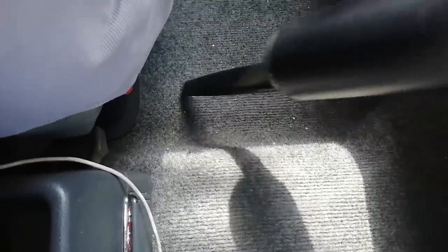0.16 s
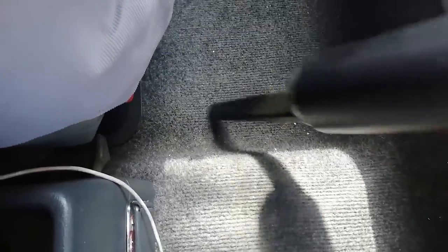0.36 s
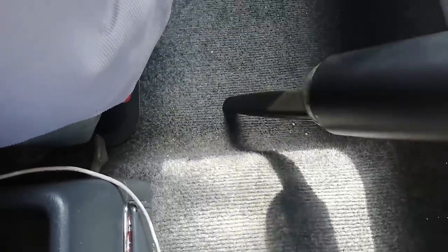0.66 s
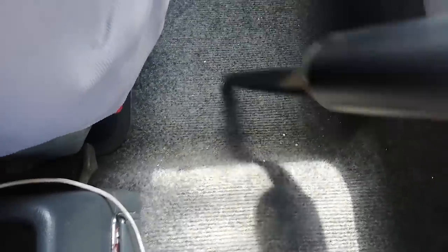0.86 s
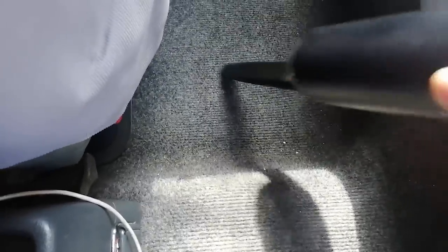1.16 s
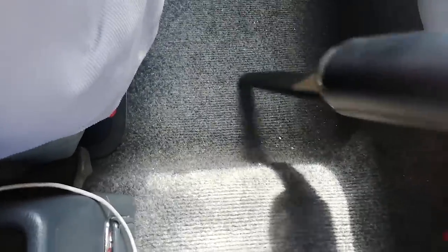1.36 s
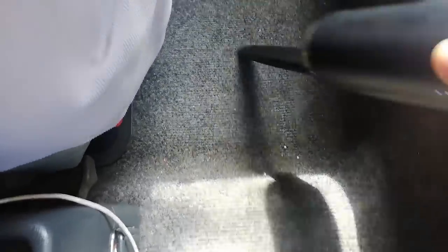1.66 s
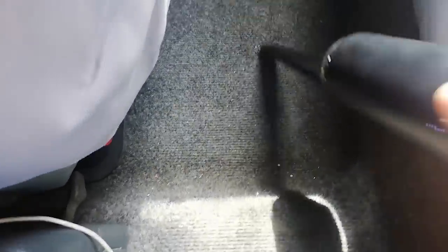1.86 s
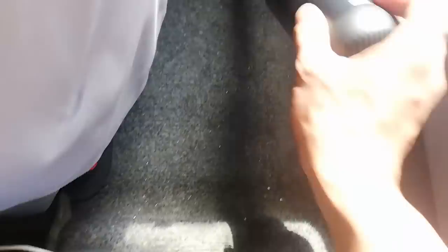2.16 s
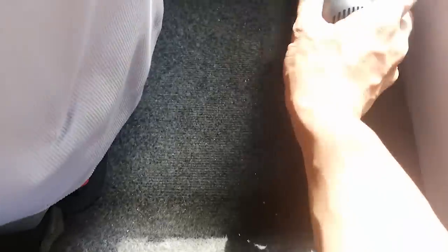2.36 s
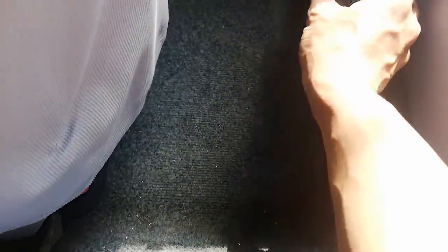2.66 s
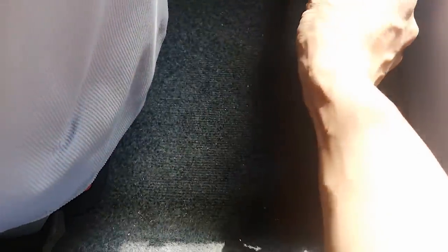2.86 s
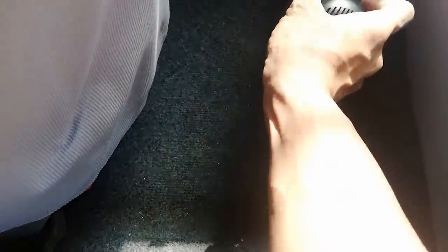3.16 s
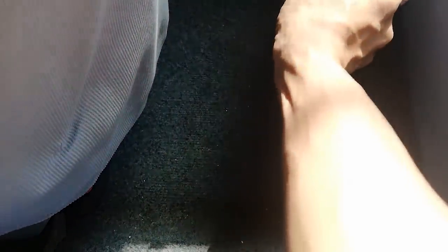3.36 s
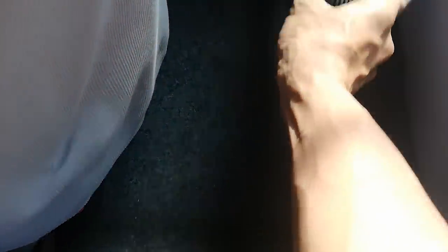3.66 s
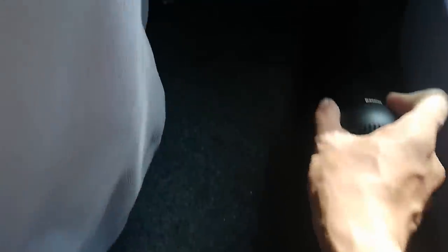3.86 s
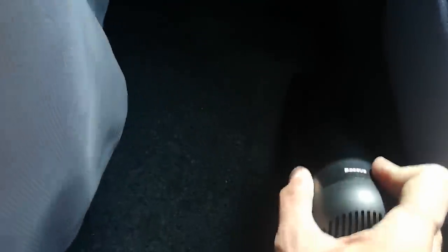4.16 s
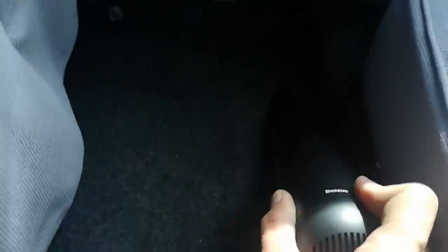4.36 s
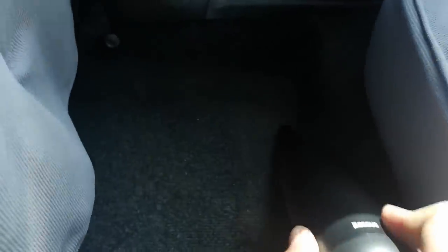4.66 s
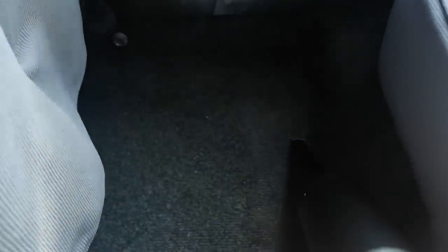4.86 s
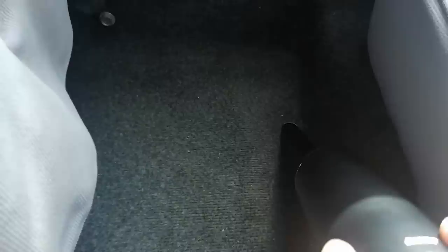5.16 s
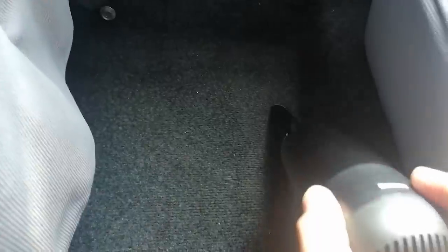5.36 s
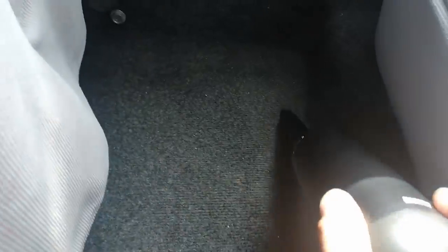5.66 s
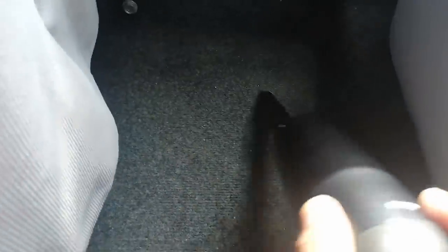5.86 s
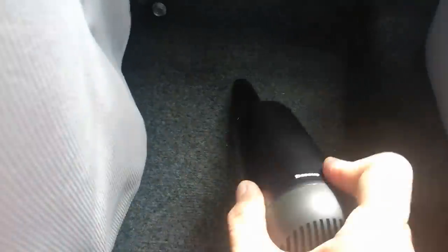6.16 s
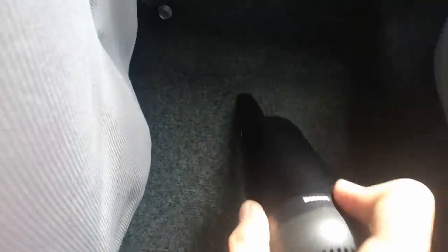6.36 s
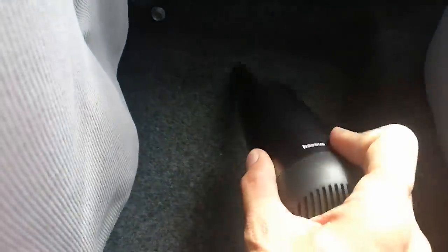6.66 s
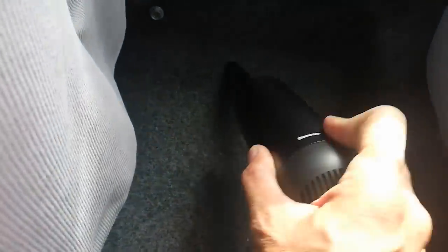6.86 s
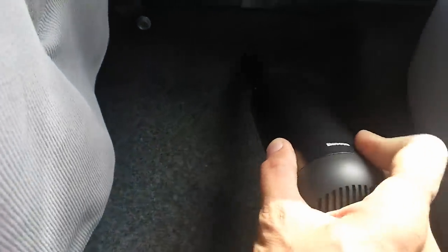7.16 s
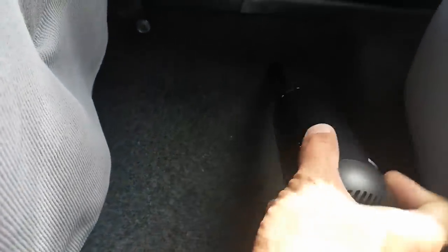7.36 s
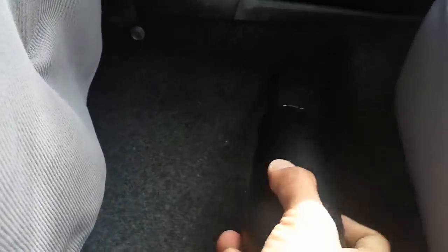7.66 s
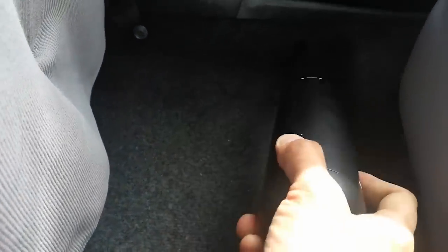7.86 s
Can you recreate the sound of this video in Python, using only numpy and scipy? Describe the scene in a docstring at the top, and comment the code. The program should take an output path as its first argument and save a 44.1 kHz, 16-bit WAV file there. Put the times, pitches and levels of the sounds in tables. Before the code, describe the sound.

A small handheld vacuum whines and hisses over car carpet, shifting between ears, bumps the floor once, then switches off and begins winding down.

```python
"""A small handheld vacuum moves over the carpet of an idling car: its rotor hums and its seven-blade fan whines.
Both are sums of sine waves locked to one rotor angle; standing waves in the footwell shift them from ear to ear.
Air roars in the housing, rushes from the vents and hisses at the nozzle: all filtered noise.
The car's engine throbs softly below, as a few low sines and a rumble of noise.
The nozzle bumps the floor once, then the vacuum is switched off and starts to wind down."""
import sys
import numpy as np
from scipy import signal
from scipy.fft import rfft, irfft, next_fast_len
from scipy.io import wavfile
from scipy.ndimage import uniform_filter1d, map_coordinates

SR = 44100
rng = np.random.default_rng(int(sys.argv[2]) if len(sys.argv) > 2 else 0)


def materialize(psi):
    """Save the field psi as 16-bit PCM at rate SR to the path in sys.argv[1].

    A 1-D psi becomes a single channel; in a 2-D psi each row is a channel.
    """
    bounded = np.clip(np.atleast_2d(psi).T, -1, 1)
    quanta = np.round(bounded * 32767).astype(np.int16)
    wavfile.write(sys.argv[1], SR, quanta)


N = 353593  # length in samples

# rotor speed under power, shifting a little with the load on the nozzle: t/s, turns per second/Hz
POWERED_SPEED = [(0.0, 525.2), (0.21, 524.9), (0.4, 527.1), (0.83, 524.9), (1.66, 526.6), (1.77, 528.5),
                 (2.32, 523.1), (2.77, 527.2), (3.02, 525.0), (3.26, 526.8), (3.75, 523.0), (4.01, 526.6),
                 (4.13, 523.6), (4.3, 525.0), (4.52, 522.4), (4.73, 525.2), (5.32, 522.9), (5.35, 526.3),
                 (5.58, 523.3), (5.9, 527.8), (6.35, 524.2), (6.65, 527.4), (6.84, 525.4), (7.01, 527.5),
                 (7.26, 523.7), (7.39, 525.4), (7.65, 522.9)]
# which ear the nozzle points to as the hand turns it: t/s, left minus right/dB
NOZZLE_AIM = [(0, -9), (.6, -13.5), (1.15, -9), (1.9, -7.5), (2.15, -3), (3.9, -3), (4.55, 8), (5.4, 5.5),
              (6.3, 5.5), (7.4, 4.5), (8.01, 8.5)]
# how far the left ear leads in the standing waves: t/s, hum lead/rad, blade tone lead/rad
EAR_LEAD = [(0, 2.4, -1), (.6, 2.9, -.5), (1.8, 1.8, .2), (2.1, 2.1, -1), (2.6, 1, -3), (3.3, 1.3, -2.4),
            (3.7, 1.3, -3.8), (4.3, 1.5, -1.3), (4.6, 1.6, -2.6), (5.4, 1.5, -.9), (5.85, 1.5, -1.9),
            (6.3, 1.5, 1.6), (7.2, 1.5, -1), (8, 2.2, -4.4)]
# strokes that press the nozzle into the pile, lifting its hiss and the blade tone's octave: t/s, lift/dB
PILE_STROKES = [(.56, 2.5), (1.42, 4.5), (1.9, 4), (7.6, 2)]
STROKE_S = 0.078  # time from a stroke's peak until its lift has dropped to 1/e


def amp(db):
    """Turn decibels into a gain."""
    return 10 ** (np.asarray(db) / 20)


def unit(x):
    """Scale x to an rms level of 1."""
    return x / np.sqrt(np.mean(x ** 2) + 1e-20)


def along(points, hz):
    """Read a table of (Hz, value) points at any frequency, on a logarithmic frequency axis."""
    f, v = np.transpose(points)
    return np.interp(np.log(hz + 1), np.log(f + 1), v)


def curves(rows):
    """Draw one curve over time for each table column after the time."""
    s, *columns = np.transpose(rows)
    t = np.arange(N) / SR
    return np.array([np.interp(t, s, column) for column in columns])


def humps(events, half_s):
    """Draw a dB curve with one smooth hump for each (time, dB) event."""
    t = np.arange(N) / SR
    return sum(db * np.exp(-((t - s) / half_s) ** 2) for s, db in events)


def wobble(rate):
    """Draw a smooth random curve around zero, with this many random knots a second."""
    coarse = np.arange(0, N, 32)
    knots = rng.standard_normal(4096)
    smooth = map_coordinates(knots, [coarse * rate / SR], mode="wrap")
    return np.interp(np.arange(N), coarse, smooth)


def ears(side_db):
    """Give left and right gains for a left-minus-right level."""
    return amp(np.array([side_db, -side_db]) / 2)


def filtered(x, response):
    """Filter x by multiplying its spectrum by a response of frequency."""
    size = next_fast_len(N + SR // 4)
    hz = np.fft.rfftfreq(size, 1 / SR)
    return irfft(rfft(x, size) * response(hz), size)[..., :N]


def colour(points):
    """Make a filter response from (Hz, dB) points."""
    return lambda hz: amp(along(points, hz))


def resonances(modes):
    """Make a response of (Hz, width, dB) peaks; each falls to about half its gain at the edges of its width."""
    return lambda hz: sum(amp(db) / (1 + ((hz - centre) / (0.54 * width)) ** 2)
                          for centre, width, db in modes)


def turbulence(response):
    """Make coloured stereo noise of rms 1; swirling air sounds alike at both ears only in the bass."""
    # likeness of the two ears: f/Hz, coherence (1 = identical)
    likeness = [(100, 1), (1400, 0.33), (2400, 0.048), (5000, 0.013)]

    def mid_side(hz):
        turn = np.arccos(np.clip(along(likeness, hz), -1, 1)) / 2
        return response(hz) * np.array([np.cos(turn), np.sin(turn)])

    mid, side = filtered(rng.standard_normal((2, N)), mid_side)
    return unit(np.array([mid + side, mid - side]))


def shifting(x, depth_db):
    """Colour x by footwell reflections: patches of pitch and time grow stronger or weaker as the hand moves."""
    spectrogram = signal.stft(x, nperseg=1024)[2]
    field = rng.standard_normal(spectrogram.shape)
    for _ in range(2):
        field = uniform_filter1d(field, size=7, axis=1)  # smooth over frequency
        field = uniform_filter1d(field, size=20, axis=2)  # smooth over time
    patched = spectrogram * amp(depth_db * unit(field))
    return unit(signal.istft(patched, nperseg=1024)[1][:, :N])


def rotor_speed():
    """Turns a second: nearly steady under power, then slowed by air drag and friction."""
    off_s = 7.677  # the moment of switch-off
    halving_s = 1.52  # time in which air drag alone would halve the speed
    friction_hz_per_s = 70
    coast_s = np.maximum(np.arange(N) / SR - off_s, 0)
    return curves(POWERED_SPEED)[0] / (1 + coast_s / halving_s) - friction_hz_per_s * coast_s


def shaft_angle(jitter_hz):
    """Add up the speed to get the rotor's angle in radians; the speed trembles slightly."""
    return 2 * np.pi * np.cumsum(rotor_speed() + jitter_hz * wobble(22)) / SR


def wall(order):
    """Gain as a falling tone slides in and out of step with its reflection from a near footwell wall."""
    echo_s, echo_share = 0.0029, 0.67  # delay and strength of the reflection
    slip_hz = order * (rotor_speed() - curves(POWERED_SPEED)[0])
    # no slip under power, so the gain stays 1 until the switch-off
    return np.abs(1 + echo_share * np.exp(2j * np.pi * slip_hz * echo_s)) / (1 + echo_share)


def tone(angle, level_db, lead, rough, fade_db):
    """One tone at both ears, shaken by the flow and fading a little at each ear as the hand moves."""
    shake = 1 + rough * (wobble(25) + 0.86 * wobble(140))
    fade = fade_db * np.array([wobble(7), wobble(7)])
    waves = np.sin([angle + lead / 2, angle - lead / 2])  # the left ear leads by this many radians
    return np.sqrt(2) * amp(level_db + fade) * shake * waves  # the root makes the level an rms level


def standing(angle, fade_rate, steady):
    """A tone of rms 1 at each ear: a direct wave plus reflections that swell and cancel."""
    own = angle + rng.uniform(0, 2 * np.pi)
    sine, cosine = np.sin(own), np.cos(own)

    def one_ear():
        return unit((steady + wobble(fade_rate)) * sine + wobble(fade_rate) * cosine)

    return np.array([one_ear(), one_ear()])


def engine(firing_hz):
    """The idling engine's firing pulses throb through the cabin with a rumble, alike at both ears."""
    # level of the throb: t/s, level/dB
    throb_level = [(0, -36), (.7, -35.5), (3, -30.5), (4.3, -35), (5.2, -32.5), (5.9, -39.5), (6.6, -37.5),
                   (8, -29)]
    # balance of its tones: multiple of the firing rate, relative level/dB
    firing_orders = [(1, -1.5), (2, -23.5), (3, -28), (5, -34)]
    # colour of the rumble: f/Hz, relative level/dB
    rumble_colour = [(15, -23), (35, -27), (50, -16), (85, -2), (110, -10), (150, 1), (200, -3), (400, -25),
                     (1000, -14.5)]
    angle = 2 * np.pi * np.cumsum(firing_hz + 0.262 * wobble(4.6)) / SR
    throb = sum(amp(db) * np.sin(round(order) * angle) for order, db in firing_orders)
    rumble = unit(filtered(rng.standard_normal(N), colour(rumble_colour)))
    rumble_db = -43.5 + 1.2 * wobble(6)
    return amp(curves(throb_level)[0]) * unit(throb) + amp(rumble_db) * rumble


def bumps():
    """The nozzle bumps the floor in three close knocks; each rings the damped, carpeted floor."""
    # the knocks: t/s, level/dB
    knocks = [(6.551, -14), (6.558, -17), (6.583, -23)]
    # the floor's ringing: f/Hz, relative level/dB, time to fall by 60 dB/s
    floor_modes = [(85, -7, 0.12), (150, 0, 0.048), (212, -3.5, 0.058), (340, -5, 0.03), (663, 1, 0.019)]
    out = np.zeros(N + SR)
    t = np.arange(SR // 4) / SR
    thud = sum(amp(db - 60 * t / t60) * np.sin(2 * np.pi * hz * t) for hz, db, t60 in floor_modes)
    thud = thud * (1 - np.exp(-t / 0.003))  # a soft start
    for s, db in knocks:
        out[round(s * SR):][:len(t)] += amp(db) * thud
    return out[:N]


def cavities():
    """The flow makes narrow cavity resonances flutter beside the rotor's tones."""
    # the two resonances: f/Hz, width/Hz
    hollows = [(1555, 33), (2646, 39)]
    # strength of their flutter: t/s, low cavity level/dB, high cavity level/dB
    flutter_level = [(0, -34, -31), (1.2, -24.5, -25.5), (1.8, -24, -19), (2.1, -28, -28), (4, -36, -32),
                     (5.6, -66, -29.5), (6.4, -38, -26), (7, -32, -55), (8, -40, -54)]
    out = 0
    for (hz, width), db in zip(hollows, curves(flutter_level)):
        out = out + amp(db) * turbulence(resonances([(hz, width, 0)]))
    return amp([[1], [-3]]) * out  # left up 1 dB, right down 3 dB


def airflow():
    """Air roars in the housing, rushes from vents and hisses at the nozzle; all falls with the rotor's speed."""
    # roar in the housing: t/s, left level/dB, right level/dB
    duct_level = [(0, -24.7, -29), (1.12, -24.5, -32), (1.48, -22, -41), (2.24, -24, -44),
                  (2.56, -21.5, -49), (4.0, -20, -49), (4.16, -24.5, -27), (4.4, -31, -33.5),
                  (6.4, -30, -27.5), (6.84, -32.5, -37), (8.01, -29.5, -27)]
    # resonances of the housing: f/Hz, width/Hz, relative level/dB
    housing_modes = [(864, 85, -9), (1233, 69, 1.5), (1443, 140, 4.5), (1632, 200, 1), (2022, 340, 0.5)]
    # colour of the rush at the vents: f/Hz, relative level/dB
    vent_colour = [(40, -39), (120, -23.5), (450, -11.5), (720, -15.5), (1100, -6), (1800, -14), (2200, 1),
                   (2500, 2.5), (2900, 0), (3500, -0.5), (4000, -6), (5500, -4), (9000, -73)]
    # strength of the suction hiss, before the strokes lift it: t/s, level/dB
    hiss_level = [(0, -26), (.85, -26.5), (2.1, -25.5), (2.6, -29.5), (3.1, -25.5), (3.7, -27),
                  (4.4, -20.5), (5.4, -21.5), (6.3, -20), (7.4, -23), (8.01, -19)]
    # colour of the hiss: f/Hz, relative level/dB
    hiss_colour = [(1500, -22.5), (3400, -0.5), (4400, -2.5), (5300, 0), (5800, 0), (6400, 3.5),
                   (7100, -2.5), (8300, 1), (9400, 0.5), (10200, -6), (11400, -4), (12400, -13),
                   (13600, -14), (15500, -32)]
    aim_db, speed = curves(NOZZLE_AIM)[0], rotor_speed()

    duct = amp(curves(duct_level)) * shifting(turbulence(resonances(housing_modes)), depth_db=1.5)

    vent_db = -25 - 0.23 * aim_db  # the vents lose level when the nozzle aims left
    vent_side_db = 3 + 0.27 * aim_db  # they follow part of the aim
    vents = shifting(turbulence(colour(vent_colour)), depth_db=1.9)
    vents = amp(vent_db) * ears(vent_side_db) * vents

    gap = amp(0.75 * wobble(11))  # the nozzle's gap opens and closes on the pile
    hiss = gap * shifting(turbulence(colour(hiss_colour)), depth_db=2.5)
    # the top beams forward, so it depends on the aim: stronger to the right
    top = filtered(hiss, lambda hz: 1 / (1 + (9500 / (hz + 1)) ** 8))
    top_db = 2 - 0.44 * aim_db
    hiss = hiss + (amp(top_db) - 1) * top
    hiss_db = curves(hiss_level)[0] + humps(PILE_STROKES, STROKE_S)
    nozzle = amp(hiss_db) * ears(aim_db) * hiss

    air_fall = 1.6  # dB of air noise lost for each dB of speed
    return (speed / speed[0]) ** air_fall * (duct + vents + nozzle)


def fan(angle):
    """Seven blades whine seven times a turn, with weaker tones; upper tones beam to the same side as the hiss."""
    # blade tone, before its swells: t/s, left level/dB, right level/dB
    blade_level = [(0.0, -22.5, -10.8), (2.52, -21, -19.5), (2.64, -32, -17.5), (2.88, -27, -14.5),
                   (3.18, -14.5, -28.7), (3.45, -20, -12.5), (3.57, -15.7, -38), (3.75, -23, -15),
                   (3.96, -29.0, -16), (4.32, -12.5, -27.0), (4.83, -16.5, -21), (5.79, -16, -26.5),
                   (6.0, -13, -20.5), (6.36, -15.6, -36), (6.54, -14, -21), (7.38, -9.5, -31),
                   (7.56, -16.5, -27), (8.01, -18.5, -34)]
    # the blade tone swells or drops out as the hand crosses the standing waves: t/s, change/dB
    blade_swells = [(1.98, 5), (2.08, -6), (3.02, -2), (3.35, -3), (6.01, 4)]
    # the blade tone's octave, before the strokes and the aim: t/s, level/dB
    octave_level = [(0, -29.5), (.6, -31.5), (1.9, -33.5), (3.9, -30.5), (4.45, -22.5), (5.05, -34),
                    (6.05, -21), (6.55, -25.5), (7.1, -22), (7.7, -26.5), (8.01, -36)]
    # the blade tone's third harmonic, before its beaming: t/s, level/dB
    third_level = [(0, -38), (.75, -21.5), (1.55, -37), (1.88, -27), (2.4, -36), (4.3, -43), (5.8, -34),
                   (6.6, -49), (8.01, -32.5)]
    # weaker tones, before beaming and treble roll-off: multiple of the rotor speed, level/dB
    weak_orders = [(4, -34), (5, -33), (8, -34), (10, -36.5), (12, -38), (13, -42), (15, -33), (16, -41),
                   (17, -39), (18, -39), (19, -44), (20, -44), (22, -44), (23, -45), (24, -46), (27, -42),
                   (28, -39)]
    aim_db, speed = curves(NOZZLE_AIM)[0], rotor_speed()
    beam = ears(0.6 * aim_db)

    blade_db = curves(blade_level) + humps(blade_swells, half_s=0.06)
    out = wall(order=7) * tone(7 * angle, blade_db, curves(EAR_LEAD)[1], rough=0.075, fade_db=1)

    octave_db = curves(octave_level) + humps(PILE_STROKES, STROKE_S)
    octave_lead = 1 + 0.59 * wobble(2.91)
    octave = tone(14 * angle, octave_db, octave_lead, rough=0.16, fade_db=5.0)
    out += wall(order=14) * ears(aim_db) * octave
    out += beam * amp(curves(third_level)[0]) * standing(21 * angle, fade_rate=10.0, steady=0.38)

    # uneven blades fill in the upper multiples; orders 4 and 5 are motor buzz that fades after switch-off
    buzz_drive = (speed / speed[0]) ** 9  # the buzz loses 9 dB for each dB of speed
    weak = 0
    for order, db in weak_orders:
        drive = buzz_drive if order < 7 else 1
        partial = standing(round(order) * angle, fade_rate=4.4, steady=0.33)
        weak = weak + amp(db) * drive * partial
    # a fixed treble roll-off at the microphone weakens the highest tones; they emerge as the fan slows
    roll_off = colour([(11800, 0), (12600, -5), (14200, -19)])
    return out + beam * filtered(weak, roll_off)


def motor(angle):
    """The unbalanced rotor hums once a turn, and the motor's poles add a buzz at multiples of that."""
    # hum, once a turn: t/s, left level/dB, right level/dB
    hum_level = [(0.0, -11.5, -20.5), (0.9, -13, -29), (1.02, -11.5, -20.7), (1.41, -14.5, -36),
                 (1.53, -13, -26.5), (2.43, -16, -17.5), (3.69, -19, -22), (4.14, -10.5, -16.0),
                 (5.85, -12.2, -17.5), (6.39, -10.7, -15), (7.32, -14.5, -19.5), (7.62, -12.5, -18.5),
                 (8.01, -24.1, -28)]
    # tone twice a turn: t/s, level/dB
    second_level = [(0, -28.5), (1.1, -29), (2.28, -33), (2.52, -34), (4.3, -40), (4.9, -27), (5.7, -37),
                    (7.6, -42.5), (8.01, -27)]
    # tone three times a turn, from the motor's poles: t/s, left level/dB, right level/dB
    third_level = [(0, -25, -46), (1.1, -24, -46), (2.5, -29, -30), (3.5, -24, -27.5), (3.9, -28, -33.5),
                   (4.55, -25.5, -24), (5.1, -30, -36), (6.0, -30, -41.5), (6.6, -26.5, -24.5),
                   (8.01, -36, -38.5)]
    # tone six times a turn: t/s, level/dB
    sixth_level = [(0, -28), (1.84, -23), (2.3, -29), (4.7, -34), (6.4, -31.5), (6.8, -60), (7.75, -28.5),
                   (8.01, -55)]
    # tone nine times a turn: t/s, left level/dB, right level/dB
    ninth_level = [(0, -38, -29), (.7, -37, -38), (1.15, -34, -27), (1.92, -26, -35), (2.5, -47, -23.5),
                   (3.35, -38, -26), (4.1, -30, -33), (4.65, -23, -34), (5.55, -35, -23), (5.95, -33, -42),
                   (6.7, -26.5, -27), (7.35, -41, -31), (7.58, -11.5, -40), (8.01, -28, -46)]
    out = tone(angle, curves(hum_level), curves(EAR_LEAD)[0], rough=0.041, fade_db=0.46)
    out += amp(curves(second_level)[0]) * standing(2 * angle, fade_rate=3.15, steady=0.91)
    out += tone(3 * angle, curves(third_level), 0.086 * wobble(1.6), rough=0.19, fade_db=1.0)
    out += amp(curves(sixth_level)[0]) * standing(6 * angle, fade_rate=3, steady=2.5)
    ninth = tone(9 * angle, curves(ninth_level), 1.1 * wobble(3), rough=0.12, fade_db=2.5)
    return out + wall(order=9) * ninth


def scene():
    """Mix the vacuum, the bump and the idling car; motor and fan share one rotor angle."""
    angle = shaft_angle(jitter_hz=0.33)
    car = engine(firing_hz=30.8)
    air = cavities() + airflow()
    return car + bumps() + air + fan(angle) + motor(angle)


def record(dry):
    """The microphone chain keeps nothing from its upper band limit on."""
    top_hz = 15600
    return filtered(dry, lambda hz: hz < top_hz)


dry = scene()
out = record(dry)
materialize(out)
```